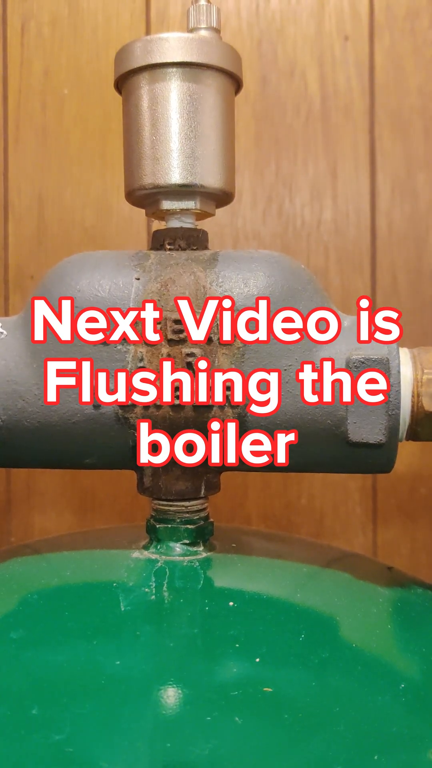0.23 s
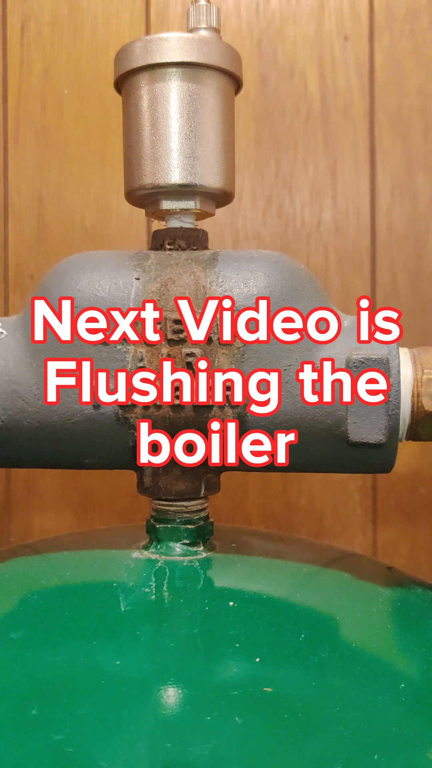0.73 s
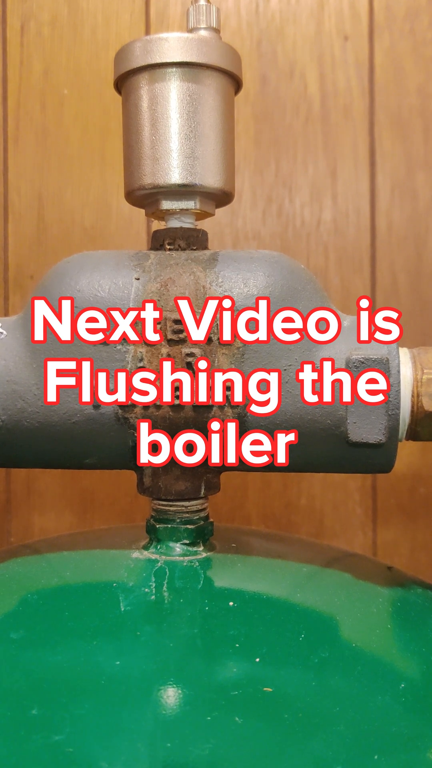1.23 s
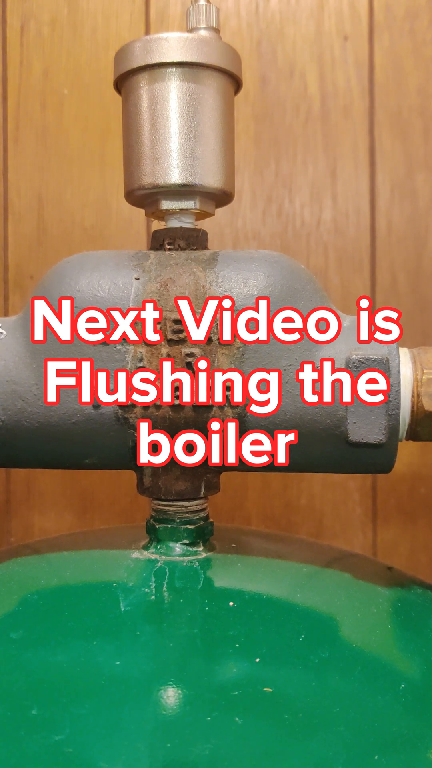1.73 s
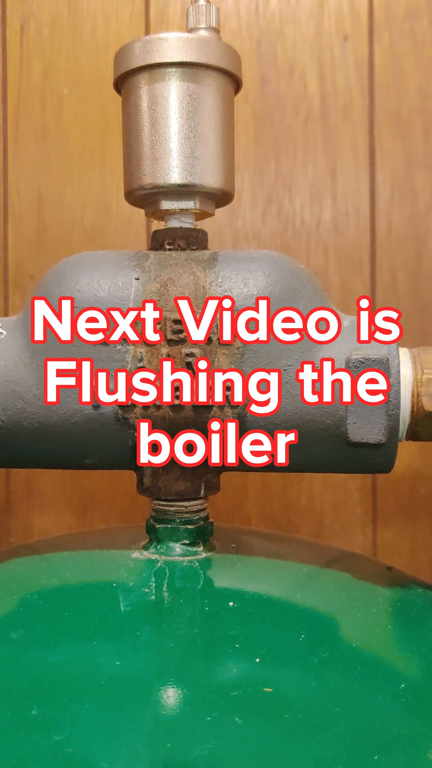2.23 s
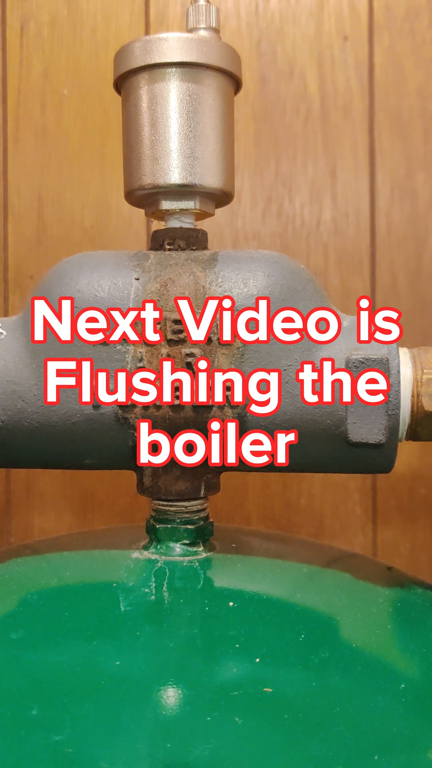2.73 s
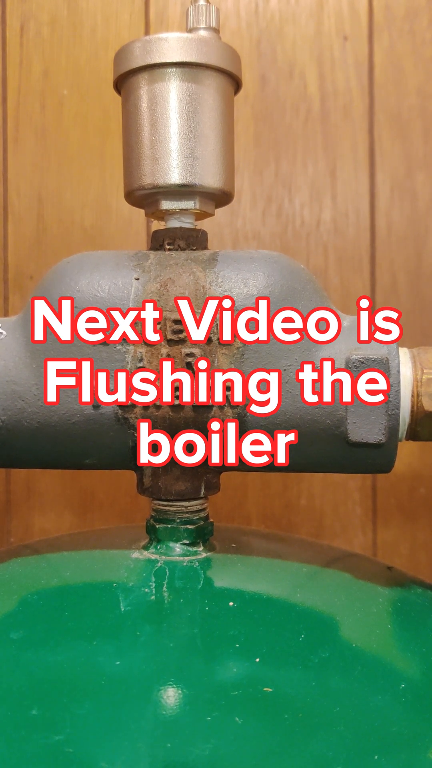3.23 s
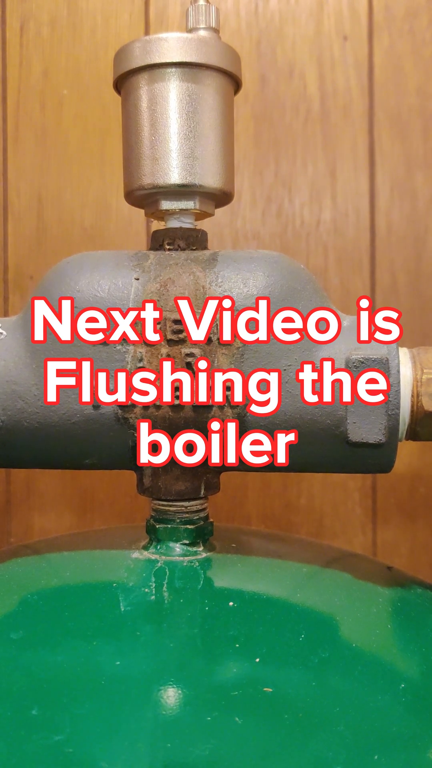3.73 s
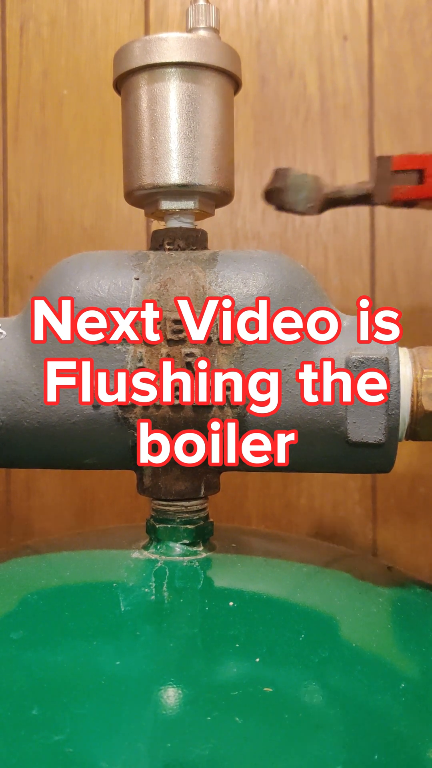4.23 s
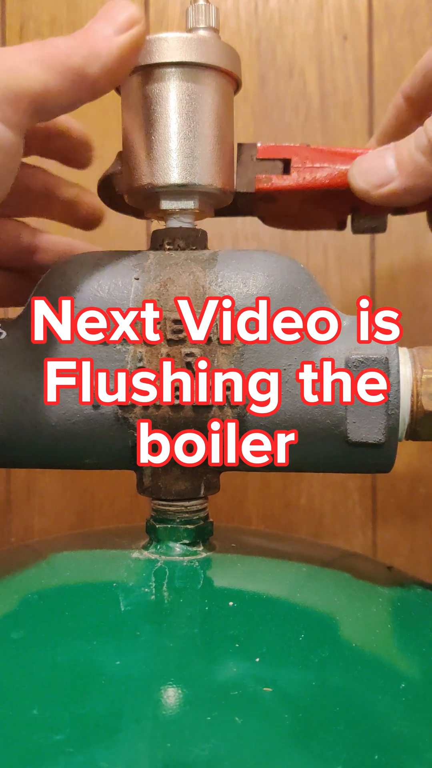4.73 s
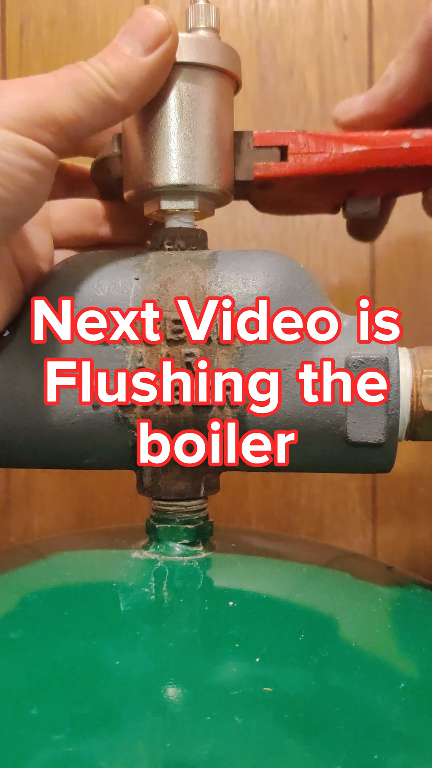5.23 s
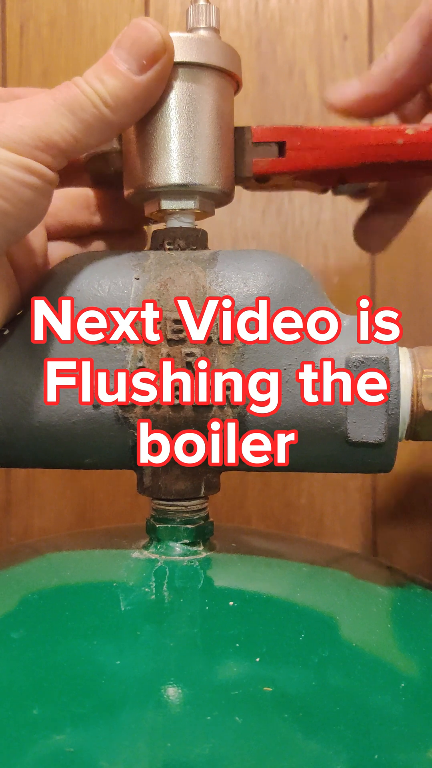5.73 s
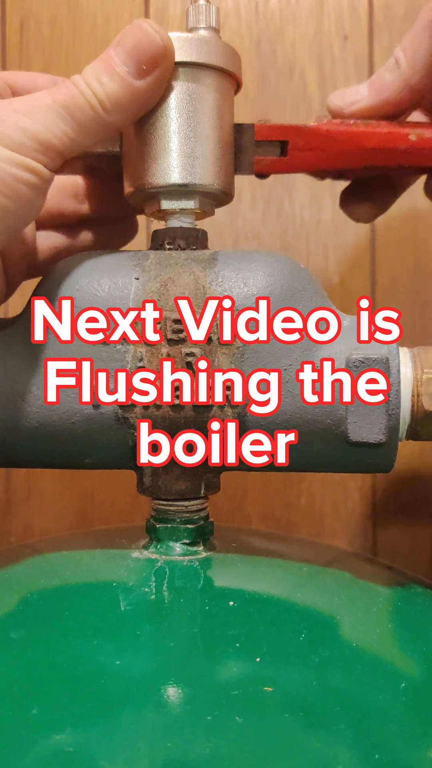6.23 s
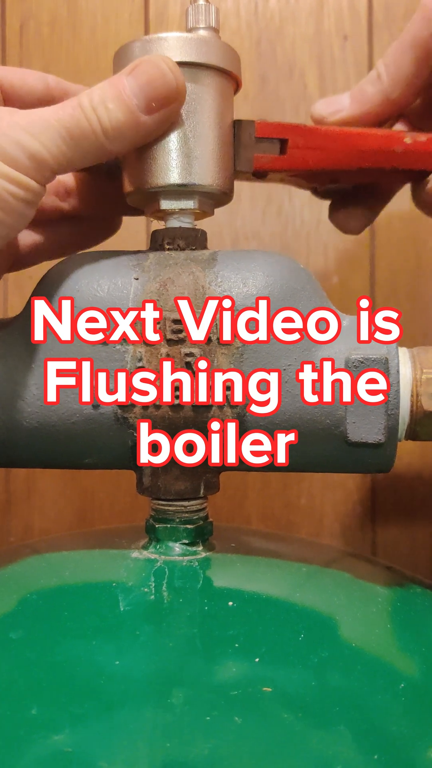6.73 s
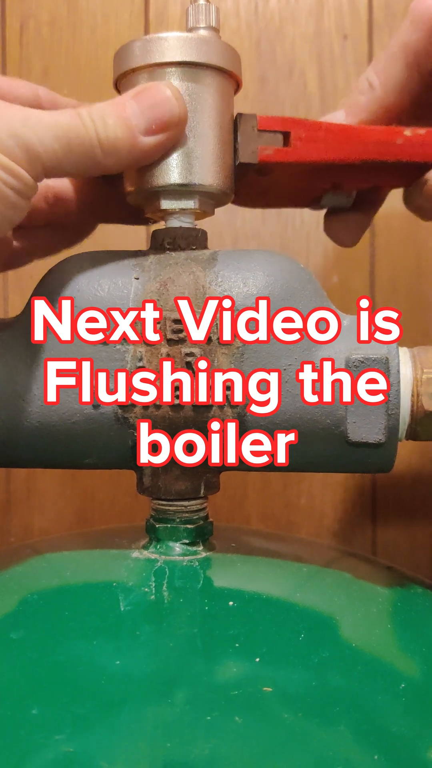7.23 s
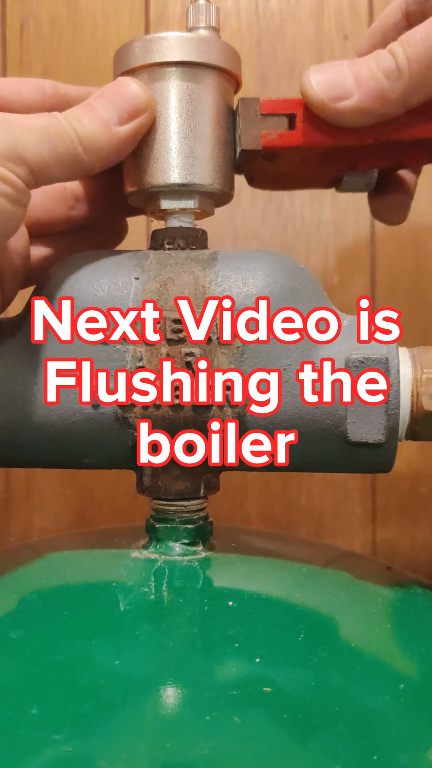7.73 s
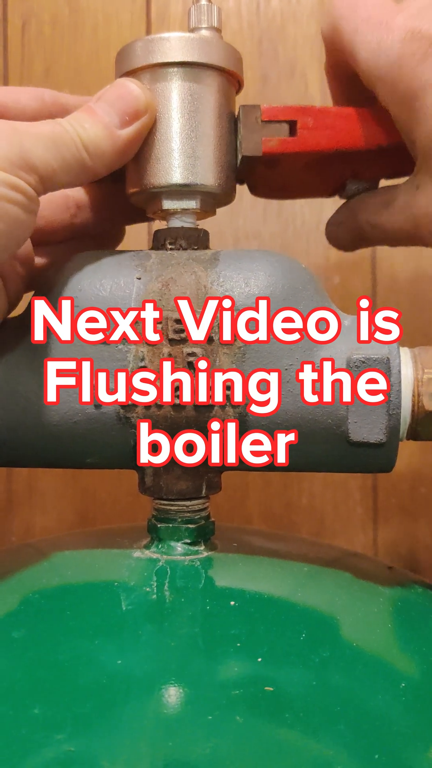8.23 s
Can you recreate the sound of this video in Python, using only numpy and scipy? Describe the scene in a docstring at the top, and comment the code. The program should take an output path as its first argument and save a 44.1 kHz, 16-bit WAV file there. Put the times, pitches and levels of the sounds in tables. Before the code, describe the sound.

Two quick knocks and a soft boom open, then the loose jaw and nut of a pipe wrench clink irregularly as it is adjusted. The wrench knocks sharply onto a brass vent, and its teeth scrape and tick while the pipe and steel tank below boom softly. Another hard knock and a few clinks follow. The microphones are close, in a small room with faint hiss.

```python
"""Two quick knocks and a soft boom sound first; then a pipe wrench clinks as its loose jaw and nut are set.
The wrench is fitted to a brass vent on an iron pipe, where its teeth knock and scrape: impacts and
stick-slip friction excite the modes of the metal. The pipe and the steel tank below boom under the hands.
A pair of microphones stands close by, in a small panelled room with a faint hiss."""
import sys
import numpy as np
from scipy import signal
from scipy.fft import rfft, irfft, next_fast_len
from scipy.io import wavfile
from scipy.ndimage import uniform_filter1d

SR = 44100
rng = np.random.default_rng(int(sys.argv[2]) if len(sys.argv) > 2 else 0)


def int16_out(signal):
    """Quantize to a 16-bit WAV file."""
    q = np.round(np.clip(np.atleast_2d(signal).T, -1, 1) * 32767)
    wavfile.write(sys.argv[1], SR, q.astype(np.int16))


N = 373527

def gain_of(db):
    return 10 ** (np.asarray(db) / 20)

def unit_rms(x):
    return x / np.sqrt(np.mean(x ** 2) + 1e-20)

def at_frequency(points, hz):
    """Interpolates (Hz, value) points on a logarithmic frequency axis."""
    f, value = np.transpose(points)
    return np.interp(np.log(hz + 1), np.log(f + 1), value)

def add(mix, start_s, sound):
    part = mix[..., round(start_s * SR):][..., :sound.shape[-1]]
    part += sound[..., :part.shape[-1]]

def colour(x, spectrum):
    """Spectral shaping by (Hz, dB) points; white noise keeps its power."""
    size = 2 * next_fast_len(N // 2 + 2000)
    gain = gain_of(at_frequency(spectrum, np.fft.rfftfreq(size, 1 / SR)))
    return irfft(rfft(x, size) * unit_rms(gain))[..., :N]

def butterworth(x, order, hz, kind="low"):
    return signal.sosfilt(signal.butter(order, hz, kind, fs=SR, output="sos"), x)

def resonate(x, hz, t60):
    """Damped oscillator: a unit impulse gives a decaying sine of height 1."""
    r, w = 10 ** (-3 / (t60 * SR)), 2 * np.pi * hz / SR
    return signal.lfilter([0, np.sin(w)], [1, -2 * r * np.cos(w), r * r], x)

def stick_slip(per_s, spread_db):
    """Stick-slip friction: a Poisson train of impulses of uneven size and random sign."""
    size = gain_of(spread_db * np.minimum(rng.exponential(1, N), 4))
    return size * (rng.random(N) < per_s / SR) * rng.choice([-1, 1], N)

def impact(chatter_s, bounces_per_s, fade_s):
    """Contact chatter: a blow and its random rebounds. Returns the force taps and their noisy grit."""
    t = np.arange(SR // 12) / SR
    chance, size = rng.random((len(t), 2)).T
    settling = np.exp(-(t / chatter_s) ** 4) + 0.07 * np.exp(-t / 0.024)
    onset = 1 - np.exp(-t / (0.4 * chatter_s))
    taps = settling * onset * (chance < bounces_per_s / SR) * (2 * size - 1)
    taps[0] = 0.9 * np.exp(-chatter_s / 0.028)  # a long chatter starts softly
    envelope = signal.lfilter([1], [1, -np.exp(-1 / (fade_s * SR))], abs(taps))
    return taps / np.linalg.norm(taps), envelope / envelope.max() * rng.standard_normal(len(t))

# The noise floor. Each row: frequency in Hz, relative level in dB.
HISS_SPECTRUM = [(12, 2.5), (20, 1), (30, -6), (142, -19.5), (300, -18.5), (527, -23.5), (1100, -25),
                 (3070, -30.5), (5000, -31), (7800, -39.5), (10000, -39), (13000, -35), (16000, -34)]
def hiss():
    """Stationary air and microphone noise, partly correlated between the two sides."""
    left, other = rng.standard_normal((2, N))
    pair = np.array([left, 0.2 * left + 0.93 * other])
    return gain_of(-57) * unit_rms(colour(pair, HISS_SPECTRUM))

# The decay of the room. Each row: frequency in Hz, reverberation time in seconds.
ROOM_DECAY = [(150, 0.25), (1000, 0.29), (4000, 0.2), (12000, 0.2)]
def room(x):
    """Reverberation: sparse reflections of random sign decay exponentially, each band at its own rate."""
    reflections = np.zeros((2, SR // 2))
    slots = np.arange(200, SR // 2 - 20, 20)
    arrivals = slots + rng.integers(0, 20, (2, len(slots)))
    np.put_along_axis(reflections, arrivals, rng.choice([-1., 1.], arrivals.shape), 1)
    hz, t, bands = signal.stft(reflections, SR, nperseg=256)
    decay = gain_of(-60 * t / at_frequency(ROOM_DECAY, hz)[:, None])
    tail = signal.istft(bands * decay, SR, nperseg=256)[1]
    return signal.fftconvolve(x[None], tail / np.linalg.norm(tail[0]), axes=1)[:, :N]

# Soft nudges of hand and handle. Each row: start in seconds, relative force in dB.
HAND_NUDGES = [(4.976, -27), (5.049, -39), (5.543, -33), (5.713, -33), (5.826, -30), (5.901, -32.5),
               (6.008, -31), (6.078, -31), (6.613, -34), (6.727, -27), (6.845, -27), (7.024, -29.5),
               (7.139, -33), (7.173, -31), (7.241, -29), (8.099, -44), (8.168, -33.5), (8.365, -31.5)]
def nudges():
    """Impulsive forcing: each nudge passes a short cluster of jolts into the pipe."""
    push = np.zeros(N)
    for start_s, db in HAND_NUDGES:
        taps, _ = impact(chatter_s=0.017, bounces_per_s=350, fade_s=0.005)
        add(push, start_s, gain_of(db) * taps)
    return push

# The hands shaking pipe and tank. Each row: time in seconds, relative boom and rumble levels in dB.
HAND_SHAKING = [(0, -29.5, -38), (.1, -38.5, -60), (.4, -91.5, -83), (4.46, -86, -89), (4.518, -120, -40.5),
                (4.651, -37.5, -47), (4.93, -38, -49), (5.06, -32, -54), (5.21, -46, -47.5),
                (5.31, -35, -48), (5.461, -54.5, -55), (6.08, -41, -66), (6.361, -56, -63),
                (6.41, -37, -59), (6.55, -52, -49), (6.71, -40, -59), (7.291, -54, -52), (7.329, -24, -52),
                (7.47, -40, -46.5), (7.899, -56.5, -59), (7.96, -68, -48), (8.05, -51, -65),
                (8.15, -46.5, -60), (8.47, -51, -59)]
# The modes of pipe and tank. Each row: frequency in Hz, nominal bandwidth in Hz, relative level in dB.
TANK_MODES = [(158, 16, -10.5), (221.7, 19, 3.5), (261.8, 27, -3.5), (296.5, 15.4, -1.5), (355.5, 29.4, 2),
              (419, 17.8, -1), (469.4, 40, -13.5)]
def tank(push):
    """Forced vibration: rubbing and pushes make the low modes boom; slow shoves rumble beneath them."""
    times, boom_db, rumble_db = np.transpose(HAND_SHAKING)
    t = np.arange(N) / SR
    jolts = stick_slip(per_s=250, spread_db=3)
    rubbed, struck = np.zeros((2, N))
    for k, (hz, width_hz, db) in enumerate(TANK_MODES):
        t60 = 1.87 / width_hz
        rubbed += gain_of(db) * resonate(jolts * rng.standard_normal(N), hz, t60)
        struck += (-1) ** k * gain_of(db) * resonate(push, hz, t60)
    rubbed, struck = butterworth([rubbed, struck], 4, hz=520)  # flesh and mass round off every jolt
    boom = gain_of(np.interp(t, times, boom_db) - 1.5) * unit_rms(rubbed) + gain_of(-6.5) * struck
    shoves = butterworth(rng.standard_normal((2, N)), 2, [22, 120], "band")
    rumble = gain_of(np.interp(t, times, rumble_db)) * unit_rms(shoves + 0.26 * shoves[::-1])
    return boom, rumble * gain_of([[1.5], [-1.5]])

# Pings and squeaks. Each row: start in seconds, starting pitch in Hz, level in dB, t60 in seconds.
SLIP_PINGS = [(.13, 166.2, -46, 0.47), (3.063, 1916, -32, 0.041), (3.68, 1047, -49, 0.076),
              (3.802, 1058, -45.5, 0.07), (4.652, 1710, -7, 0.013), (4.797, 1755, -12.5, 0.011),
              (4.87, 2150, -54, 0.81), (5.247, 1071, -32.5, 0.079), (5.43, 2333, -48.5, 0.27),
              (5.829, 2590, -37, 0.02), (6.076, 1940, -46, 0.064), (6.938, 1320, -50, 0.056),
              (7.346, 1720, -30, .015), (7.546, 2670, -32, 0.046), (8.177, 3100, -23, 0.033),
              (8.404, 2890, -39, 0.069)]
def pings():
    """Frictional excitation: as one part slips on another, one mode swells, glides up and dies unevenly."""
    t, out = np.arange(SR // 3) / SR, np.zeros(N)
    glide = 1 + 0.0071 * (1 - np.exp(-t / 0.022))
    for start_s, hz, db, t60 in SLIP_PINGS:
        contact = 1 + 0.6 * unit_rms(uniform_filter1d(rng.standard_normal(len(t)), 200))
        envelope = gain_of(db - 60 * t / t60) * (1 - np.exp(-t / (0.032 * t60)))
        cycles = hz * np.cumsum(glide) / SR
        add(out, start_s, envelope * contact * np.sin(2 * np.pi * cycles))
    return out

# The modes of the brass vent. Each row: frequency in Hz, relative level in dB, t60 in seconds.
VENT_MODES = [(890, -9, 0.19), (1420, -29.5, 0.031), (1796, -8, 0.16), (2107, -10, 0.025),
              (2450, -3.5, 0.11), (2880, -25, 0.13), (3950, -42, 0.036), (5130, -40, 0.047),
              (6670, -6.5, 0.11), (9530, -3, 0.094), (13600, 3, 0.017)]
# The noise of teeth on brass. Each row: frequency in Hz, relative level in dB.
VENT_CONTACT_SPECTRUM = [(290, -27), (500, -14.5), (631, -7), (1600, -10), (1740, -12), (2190, -6.5),
                         (6800, -11), (8330, -22.5), (16000, -28.5)]
def vent(taps, grit):
    """Modal superposition: the brass rings under the taps, over broadband contact noise."""
    ringing = sum(gain_of(db) * resonate(taps, hz, t60) for hz, db, t60 in VENT_MODES)
    return ringing + colour(grit, VENT_CONTACT_SPECTRUM)

# Teeth and palms sliding on the vent. Each row: start, swell and hold in seconds, relative level in dB.
SCRAPE_STROKES = [(4.93, 0.062, 0.07, -37.5), (5.434, 0.0079, 0.0036, -55), (5.626, .013, 0.071, -49.5),
                  (5.95, 0.011, 0.063, -54.5), (6.025, 0.033, 0.0027, -40.5), (6.373, 0.01, 0.014, -46),
                  (6.605, 0.011, 0.015, -49.5), (6.677, 0.021, 0.05, -57.5), (6.804, 0.032, 0.0062, -49),
                  (6.957, 0.036, 0.062, -58), (7.074, 0.031, 0.013, -48.5), (7.198, 0.03, .01, -57),
                  (7.286, 0.034, .003, -30), (7.584, 0.021, 0.0055, -44.5), (7.64, 0.034, 0.09, -57.5),
                  (8.075, 0.018, .002, -37.5), (8.267, 0.019, 0.0075, -52.5), (8.306, .02, 0.073, -54.5)]
def scrapes():
    """Sliding friction: dense slips and sparse harder ticks drive the vent until the grip lets go."""
    swell_db, release_db_per_s = 29, 558
    t, strokes = np.arange(SR // 3) / SR, np.zeros(N)
    for start_s, swell_s, hold_s, db in SCRAPE_STROKES:
        rise_db = swell_db * np.minimum(t / swell_s - 1, 0)
        fall_db = release_db_per_s * np.maximum(t - swell_s - hold_s, 0)
        add(strokes, start_s, gain_of(db + rise_db - fall_db))
    slips = unit_rms(stick_slip(per_s=4000, spread_db=1.5))
    ticks = unit_rms(stick_slip(per_s=150, spread_db=7.5))
    grains = slips + 0.38 * ticks
    friction = vent(gain_of(-32) * grains, grains)
    low = butterworth(friction, 2, hz=4600)
    return strokes * (gain_of(-3.5) * unit_rms(low) + gain_of(-6.5) * unit_rms(friction - low))

# The jaws knocking on the vent. Each row: start in seconds, level in dB, chatter in seconds,
# then relative levels in dB of the treble, the ring of the brass and the push into the tank.
JAW_KNOCKS = [(0.016, -20, 0.0047, -1.5, -33, -35), (0.064, -19, 0.0025, 0.5, -35, -30),
              (4.65, -13.5, 0.0033, -16.5, -12, -31), (4.699, -39.5, 0.014, -2.5, -27, -41),
              (4.7956, -17.5, 0.009, -9, -8, -20.5), (5.242, -35.5, 0.02, -5, -1.5, -34),
              (5.308, -42, 0.02, -9, -4.5, -46), (6.393, -34, 0.0063, -7, -7, -38),
              (7.324, -14, 0.0053, -6, -14, -13.5), (7.346, -22.5, 0.0038, -5.5, -38, -10)]
def knocks():
    """Impact excitation: returns the airborne sound of the vent and the force carried down the pipe."""
    bass_drive, treble_drive = np.zeros((2, 2, N))
    push, crossover_hz = np.zeros(N), 4000
    for start_s, db, chatter_s, treble_db, ring_db, push_db in JAW_KNOCKS:
        taps, grit = impact(chatter_s, bounces_per_s=400, fade_s=0.0077)
        hit = np.array([gain_of(ring_db) * taps, gain_of(-4) * grit])
        add(bass_drive, start_s, gain_of(db) * hit)
        add(treble_drive, start_s, gain_of(db + treble_db + 4) * hit)
        add(push, start_s, gain_of(push_db) * taps)
    bass = butterworth(vent(*bass_drive), 2, crossover_hz)
    bright = vent(*treble_drive)
    treble = bright - butterworth(bright, 2, crossover_hz)
    return bass + treble, push

# The modes of the wrench. Each row: frequency in Hz, relative level in dB, ungripped t60 in seconds.
WRENCH_MODES = [(1042, -21, 0.047), (1970, -28, 0.27), (2340, -20, 0.065), (2903, -5, 0.11),
                (2957, -11.5, 0.104), (3906, 1, 0.051), (3950, -4.5, 0.12), (4420, -5, 0.08),
                (5050, -1.5, 0.053), (5580, -14, 0.05), (5750, -10, 0.1), (5840, -4.5, 0.12),
                (7050, -0.5, 0.085), (7180, -8.5, 0.025), (7370, -13.5, .07), (8620, -13, 0.052),
                (11300, -30.5, .05), (13060, -23, .05)]
# The five groups of those modes. Each entry: centre frequency in Hz.
MODE_GROUP_HZ = [2900, 3830, 4420, 5820, 7070]
# The spots a blow can land on. Each entry: name, then the gain in dB of each group, low to high.
STRIKE_SPOTS = {"low": (1.5, -16.5, -6, -14.5, -22.5), "second": (-7, 4, -9, -17.5, -4.5),
                "middle": (-7, -12.5, 0, -11, -14), "fourth": (-8.5, -20, -20, 4.5, 1),
                "top": (-16.5, -17, -9, -5, 1.5), "ends": (-3.5, -13.5, -6, -8, -1.5),
                "low fourth": (-4, -14.5, -17.5, -1.5, -9.5), "broad": (-3, -2.5, -1, -15, -7.5),
                "low alone": (1, -24.5, -31, -23.5, -34)}
# The crack of the contact itself. Each row: frequency in Hz, relative level in dB.
CRACK_SPECTRUM = [(300, -19.5), (800, -13), (1500, -4.5), (2500, 3), (5000, 4.5), (7300, 3.5), (8300, -7.5),
                  (12000, -14), (16000, -15)]
# The loose jaw and nut clinking. Each row: start in seconds, relative crack level in dB,
# chatter in seconds, relative ring level in dB, spot struck.
WRENCH_CLINKS = [(0.357, -47, 0.0055, -50.5, "low"), (0.409, -67, 0.0025, -56, "low alone"),
                 (.478, -46, 0.028, -42.5, "top"), (0.516, -71, 0.019, -42, "middle"),
                 (0.7714, -44.5, 0.0019, -32, "low alone"), (0.904, -73, 0.0094, -48.5, "low"),
                 (1.089, -51.5, 0.0011, -58, "broad"), (1.202, -53, 0.0082, -40, "low"),
                 (1.223, -30.5, 0.0079, -27, "top"), (1.306, -46, 0.0046, -47, "low"),
                 (1.331, -36.5, 0.017, -36.5, "low fourth"), (1.402, -27, 0.015, -23, "ends"),
                 (1.4124, -27, 0.014, -22.5, "fourth"), (1.425, -26.5, 0.0068, -25, "low"),
                 (1.566, -42.5, 0.0044, -54, "second"), (1.579, -39.5, 0.0076, -35.5, "low"),
                 (1.65, -51.5, 0.0055, -52, "low alone"), (1.707, -35, 0.0036, -37.5, "fourth"),
                 (1.7157, -36, .004, -29.5, "ends"), (1.766, -31.5, 0.015, -37, "low"),
                 (1.777, -27, 0.0095, -30, "top"), (1.7866, -21.5, 0.0087, -30.5, "ends"),
                 (1.83, -35.5, 0.0096, -38, "low alone"), (1.935, -41, 0.0033, -40, "broad"),
                 (2.047, -29, 0.0051, -31.5, "low fourth"), (2.091, -21.5, 0.03, -24, "broad"),
                 (2.11, -23.5, 0.0019, -18, "ends"), (2.311, -46, .003, -43, "top"),
                 (2.322, -40, 0.005, -41.5, "second"), (2.343, -32, 0.0046, -46, "second"),
                 (2.415, -34, 0.016, -35, "second"), (2.4279, -36, 0.015, -23, "fourth"),
                 (2.4574, -27, 0.0071, -23.5, "middle"), (2.471, -24, 0.0097, -29.5, "ends"),
                 (2.868, -41.5, 0.0094, -79, "broad"), (3.017, -25, 0.025, -36, "broad"),
                 (3.0318, -20, 0.014, -26.5, "middle"), (3.195, -47, 0.011, -50, "low"),
                 (3.343, -42, 0.024, -43.5, "ends"), (3.421, -48, .013, -45, "ends"),
                 (3.677, -29, 0.014, -19.5, "low fourth"), (3.8, -41, 0.0092, -44.5, "broad"),
                 (3.84, -51.5, 0.0083, -49, "low"), (4.261, -52, .005, -51, "top"),
                 (4.5564, -51, 0.0062, -52, "low"), (5.2433, -37, 0.0076, -15.5, "middle"),
                 (5.679, -35.5, 0.0047, -33, "middle"), (5.803, -46, 0.0096, -48, "top"),
                 (5.8284, -29, 0.0016, -25.5, "second"), (5.9435, -41.5, 0.0088, -46, "second"),
                 (5.962, -47, 0.0053, -38, "middle"), (6.078, -30.5, 0.0036, -32, "second"),
                 (6.61, -45, .002, -58, "middle"), (6.843, -59, .002, -51, "broad"),
                 (7.103, -51, 0.0012, -46, "second"), (7.183, -66, 0.0026, -52, "middle"),
                 (7.229, -59, 0.0011, -58, "broad"), (7.541, -47.5, 0.018, -30, "middle"),
                 (7.775, -37.5, 0.0028, -36, "middle"), (8.0884, -22.5, 0.004, -17, "ends"),
                 (8.1704, -25, 0.0031, -20.5, "middle"), (8.32, -51, 0.0096, -36, "broad"),
                 (8.363, -47, .008, -52, "second"), (8.396, -62, 0.012, -34, "low alone"),
                 (8.411, -70, 0.0033, -31, "low alone")]
def clinks():
    """Free vibration of the wrench: the point of impact weights its modes, and the grip damps them."""
    seated_s = 4.6  # from here on the vent in the jaws adds damping
    hz, mode_db, t60 = np.transpose(WRENCH_MODES)[..., None]
    t = np.arange(SR // 7) / SR
    window = np.cos(np.pi / 2 * t / t[-1]) * (1 - np.exp(-t / 0.00037))
    ringing, crack = np.zeros((2, N)), np.zeros(N)
    for start_s, crack_db, chatter_s, ring_db, spot in WRENCH_CLINKS:
        taps, grit = impact(chatter_s, bounces_per_s=1000, fade_s=0.0026)
        gripped_t60 = t60 * rng.uniform(0.33, 1.0) * (0.36 if start_s > seated_s else 1)
        detune, lean = rng.standard_normal((2, len(hz), 1))
        shifted_hz = hz * (1 + 0.0017 * detune)  # the loose jaw shifts the modes at each blow
        spot_db = at_frequency(list(zip(MODE_GROUP_HZ, STRIKE_SPOTS[spot])), hz)
        envelopes = window * gain_of(ring_db + mode_db + spot_db - 60 * t / gripped_t60)
        modes = envelopes * np.sin(2 * np.pi * shifted_hz * t)
        sides = gain_of(12 * np.array([lean, -lean]))  # each mode radiates its own way
        sides /= np.sqrt((sides ** 2).mean(0))
        add(ringing, start_s, signal.fftconvolve((sides * modes).sum(1), taps[None], axes=1))
        add(crack, start_s, gain_of(crack_db) * grit)
    clatter = gain_of(5.5) * ringing + gain_of(-2.5) * colour(crack, CRACK_SPECTRUM)
    return butterworth(clatter, 3, 300, "high")  # small parts radiate no bass

# The path of the wrench past the microphones. Each row: time in seconds, lag of the left side
# in samples, left-minus-right gain in dB.
WRENCH_PATH = [(0, 21.5, -3), (.4, 19.5, -6.5), (2.601, 19.5, -6.5), (3.7, 6.5, -14.5), (4.597, -7.5, -3.5),
               (8.47, -7.5, -3.5)]
def direct_sound(metal):
    """Differences of arrival time and level between the microphones locate the moving wrench."""
    n = np.arange(N)
    times, lags, balance_db = np.transpose(WRENCH_PATH)
    lag = np.round(np.interp(n / SR, times, lags)).astype(int)
    left = metal[0, np.clip(n - lag, 0, N - 1)]
    balance = gain_of(np.interp(n / SR, times, balance_db) * [[0.5], [-0.5]])
    return np.array([left, metal[1]]) * balance

def scene():
    """Superposition of the metal, the tank, their reverberation and the noise floor."""
    knocking, push = knocks()
    boom, rumble = tank(push + nudges())
    metal = clinks() + pings() + knocking + scrapes()
    reverberation = gain_of(-3.5) * room(metal.mean(0)) + gain_of(-6.5) * room(boom)
    return hiss() + reverberation + rumble + boom * gain_of([[-1.8], [-0.8]]) + direct_sound(metal)

def record(dry):
    """Band limiting: a linear-phase low-pass filter removes the highest treble."""
    lowpass = signal.firwin(511, cutoff=16000, window=("kaiser", 9), fs=SR)
    return signal.oaconvolve(dry, lowpass[None], "same")

dry = scene()
out = record(dry)
int16_out(out)
```